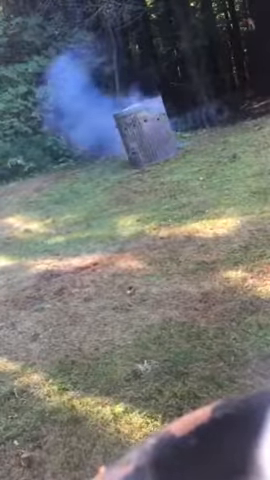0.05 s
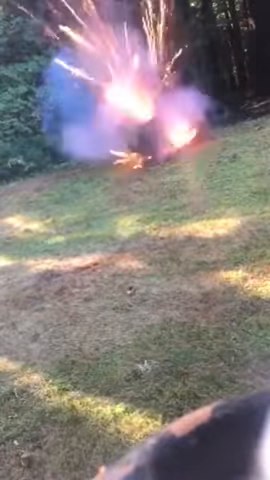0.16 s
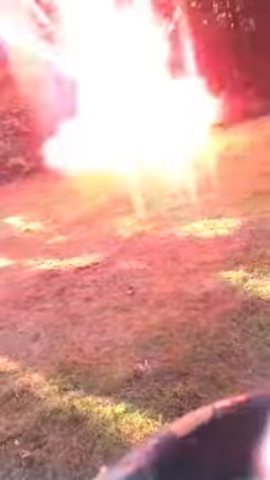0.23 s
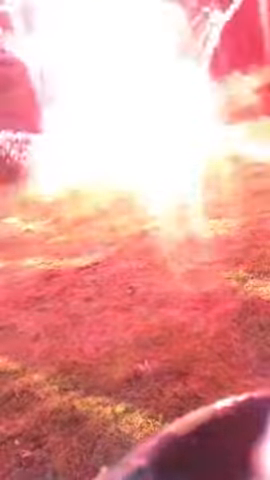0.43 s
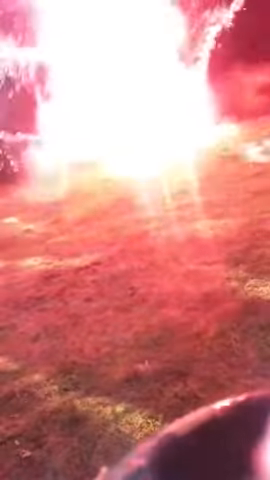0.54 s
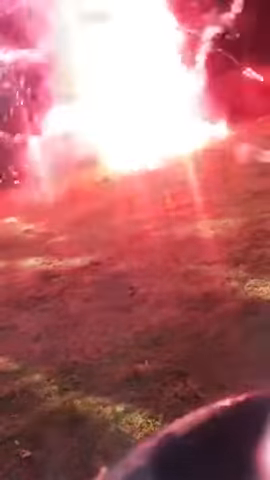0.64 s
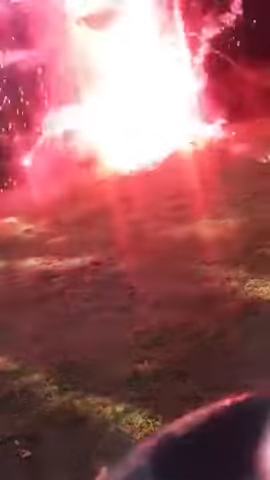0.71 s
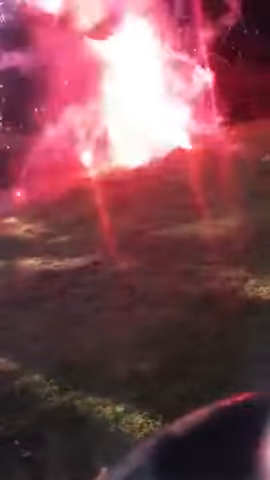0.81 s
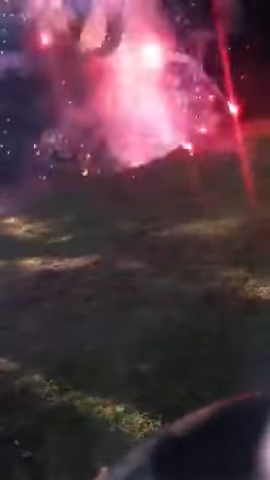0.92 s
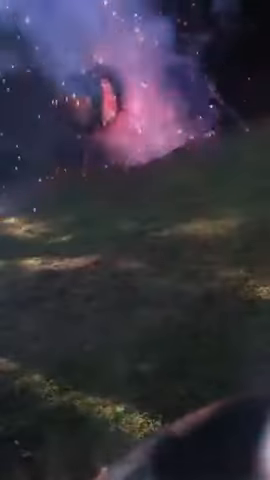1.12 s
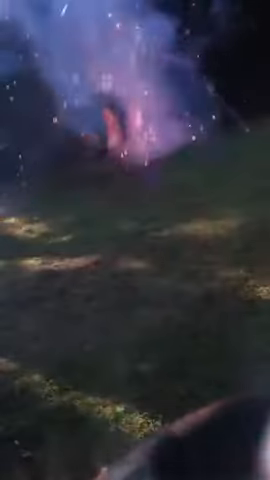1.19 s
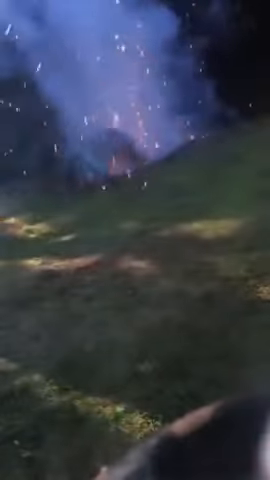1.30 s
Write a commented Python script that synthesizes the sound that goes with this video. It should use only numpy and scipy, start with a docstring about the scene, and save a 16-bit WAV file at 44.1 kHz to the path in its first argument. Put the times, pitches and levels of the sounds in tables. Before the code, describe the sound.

A firework explodes inside a trash can with a loud bang and rumbling echo.

```python
"""A firework shell bursts inside a trash can on a lawn at the edge of a wood.
First the fuse hisses over a swelling hum. The casing cracks, the can howls for an instant,
then the blast tears out in a rush of gas and the can's air booms. Bass rolls round the clearing
and the trees throw back a long echo while the hollow roar of burning stars builds.
One star snaps close by, others sputter, and at last debris comes down."""
import sys
import numpy as np
from scipy.fft import rfft, irfft, next_fast_len
from scipy.io import wavfile
from scipy.ndimage import map_coordinates

SR = 44100
rng = np.random.default_rng(int(sys.argv[2]) if len(sys.argv) > 2 else 0)


def store_wav(level_fs):
    """Save 16-bit WAV to argv[1]."""
    pcm = np.round(np.clip(np.atleast_2d(level_fs), -1, 1) * 32767)
    wavfile.write(sys.argv[1], SR, pcm.T.astype(np.int16))


N = 59535
T = np.arange(N) / SR
BURST_S, GAS_S = 0.174, 0.228  # cues: the shell gives way, the gas tears out

# pressure fronts, casing cracks first, then the blast: start_s, level_db, t60_s
FRONT_HITS = [(.1962, -25.5, 0.058), (.2021, -23, 0.0045), (0.2172, -2.5, 0.0097), (0.2194, -8.5, 0.0072),
              (.2231, -11.5, 0.0075), (0.2326, -12.5, 0.0067)]
# tone of the fronts: freq_hz, relative_db
FRONT_EQ = [(100, 3.5), (700, 6), (1800, 2.5), (4200, -6.5), (10000, -12), (16000, -18)]
# the can's brief howl: peak_s, pitch_hz, level_db, rise_s, t60_s
HOWL_MODES = [(0.2096, 1123, -4.5, 0.0028, 0.023), (.214, 597, -3.5, 0.0033, 0.034),
              (0.215, 2756, -20, 0.0081, 0.01), (0.215, 3110, -18, 0.0057, 0.019)]
# dull punch of the can giving way: freq_hz, relative_db
PUNCH_EQ = [(100, -27), (230, 0), (400, -13.5), (580, -7.5), (800, -5.5), (1150, -4), (1500, -18.5),
            (3000, -22), (4200, -54)]
# air booming in and around the can: pitch_hz, level_db, t60_s
BOOM_MODES = [(66.3, -21, 0.73), (135, -12, 0.14), (164.1, -16, 0.41)]
# rushing gas of the fireball: freq_hz, relative_db
GAS_EQ = [(150, -64), (250, -12), (450, -10), (640, 1), (800, -5.5), (970, 0), (1150, -8.5), (2100, -4.5),
          (3000, -14), (6500, -13.5), (10500, -21), (16000, -23.5)]
# rolling bass: freq_hz, relative_db
RUMBLE_EQ = [(25, -37), (45, -2.5), (97, 2.5), (170, -6.5), (230, -19.5), (320, -44)]
# low thuds and swells: peak_s, level_db, pitch_hz, rise_s
THUD_HITS = [(0.2407, -7, 47, 0.0049), (.305, -15.5, 109.4, 0.0097), (0.365, -13.5, 92, 0.0093),
             (.404, -22.5, 87, 0.0038), (.441, -24.5, 81.5, 0.019), (.535, -28, 78, .02),
             (.595, -31, 122.7, 0.027), (0.724, -36.5, 100, 0.01), (.77, -32, 70, 0.0059),
             (1.265, -32, 70, 0.0099), (1.345, -33, 80, 0.0085)]
# the wood's answer: freq_hz, relative_db
ECHO_EQ = [(150, -42), (280, -23), (386, -3), (629, -4.5), (1350, -4.5), (1980, -6.5), (3460, -20),
           (9330, -30.5), (16000, -34)]
# ring of the snapping star: pitch_hz, level_db, t60_s
SNAP_RING = [(2250, -32, 0.0073), (3300, -34, .015), (6700, -25, .009), (9660, -28, 0.0053),
             (11200, -37, 0.01)]
# the snap's duller tail: freq_hz, relative_db
SNAP_TAIL_EQ = [(400, -18), (1300, 5), (2900, -2), (4200, -22)]
# hollow resonances of the burning stars: pitch_hz, width_hz, relative_db
HOLLOW_MODES = [(602, 53, -1.5), (684, 52, 0), (939, 48, -2.5), (1350, 44, -7.5), (1870, 120, -16.5)]
# broad rush of the burning stars: freq_hz, relative_db
BURN_EQ = [(25, -37), (45, -11.5), (64, -2), (108, -8.5), (185, -13), (285, -30.5), (400, -22.5),
           (500, -18.5), (640, -8), (760, -23), (936, -22), (1700, -23.5), (2200, -22), (3160, -39),
           (5430, -36), (8000, -41.5), (12000, -38.5), (16000, -43)]
# sputters of the stars: start_s, level_db, t60_s
SPUTTER_HITS = [(1.093, -47, 0.075), (1.171, -52.5, 0.33), (1.256, -51, 0.022), (1.32, -43.5, .05)]
# their bright fizz: freq_hz, relative_db
SPUTTER_EQ = [(1500, -35), (3300, -3), (4400, 4), (6200, 1), (8000, -11), (16000, -17)]
# rustle of landing debris: freq_hz, relative_db
DEBRIS_EQ = [(100, -8), (600, -6), (1010, -8), (1760, -8), (3000, -23), (16000, -39)]
# fuse hiss and outdoor air: freq_hz, relative_db
FUSE_EQ = [(25, -2), (70, 13), (250, -1), (950, 0), (2020, -8.5), (2750, -17.5), (3200, -7.5),
           (3700, -20.5), (4450, -9.5), (4950, -30), (5700, -10.5), (8000, -31), (16000, -24)]


def pressure_fronts():
    """Each front is a short, sharp crack; the main one carries a shock: a push, then suction."""
    shock_s, push_s = 0.2174, 0.00012
    level = sum(amp(db) * envelope(start, 0.00027, 0, 60 / t60) for start, db, t60 in FRONT_HITS)
    age = np.maximum(T - shock_s, 0) / push_s
    shock = amp(5) * (T > shock_s) * (1 - age) * np.exp(-age)
    return level * noise(FRONT_EQ) + shock


def trash_can():
    """The can howls as pressure builds, gives way with a dull punch, then its air booms."""
    howl = sum(amp(db) * ring(peak, hz, rise, t60, rough=0.4) for peak, hz, db, rise, t60 in HOWL_MODES)
    punch = amp(-11.5) * envelope(0.2075, 0.013, 0, fall_db_per_s=362) * noise(PUNCH_EQ)
    boom = sum(amp(db) * ring(0.2275, hz, 0.012, t60) for hz, db, t60 in BOOM_MODES)
    return howl * (T > BURST_S) + punch + boom


def fireball():
    """Gas tears out in a dense, uneven crackle and dies quickly, with a short falling whoop."""
    level = amp(-11.6 + wobble(130.1)) * envelope(GAS_S, 0.013, 0.01, fall_db_per_s=228)
    whoop = amp(-16.5) * ring(0.283, hz=670.3, rise_s=0.0063, t60_s=0.072, rough=0.4, sag_hz_per_s=8800)
    return level * crackle(GAS_EQ, rate=3500, share=0.32) + whoop


def rumble():
    """Bass rolls round the clearing in distinct swells; a slow swell also dies slowly."""
    roll = amp(-20.5) * envelope(0.21, 0.012, 0, fall_db_per_s=46.5) * noise(RUMBLE_EQ)
    thuds = sum(amp(db) * ring(peak, hz, rise, t60_s=7.5 * rise) for peak, db, hz, rise in THUD_HITS)
    return roll + thuds


def tree_echo():
    """Bushes answer at once; then come a slap off the trunks, a ringing note and a scattered tail."""
    slap_s = 0.4228
    bushes = amp(-30) * envelope(GAS_S, 0.013, 0, fall_db_per_s=63)
    wood = amp(-35) * envelope(slap_s, 0.03, 0.082, fall_db_per_s=48.5)
    slap = amp(-31) * envelope(slap_s, 0.00052, 0, fall_db_per_s=2000)
    note = amp(-29) * ring(0.457, hz=662, rise_s=0.0041, t60_s=0.085)
    return (np.hypot(bushes, wood) + slap) * crackle(ECHO_EQ, rate=1600, share=0.12) + note


def star_snap():
    """One star snaps close by: a bright crack that rings for a moment, with a faint, duller tail."""
    start_s, rise_s, crack_t60_s = 0.8986, 0.00015, 0.013
    hiss = unit(filtered(rng.standard_normal(N), lambda hz: hz > 1800))
    crack = amp(-27.5) * envelope(start_s, rise_s, 0, 60 / crack_t60_s) * hiss
    ping = np.zeros(N)
    for hz, db, t60 in SNAP_RING:
        level = amp(db) * envelope(start_s, rise_s, rise_s, 60 / t60)
        ping += level * np.sin(2 * np.pi * hz * (T - start_s))
    tail = amp(-47) * envelope(start_s, 0.0097, 0, fall_db_per_s=420) * noise(SNAP_TAIL_EQ)
    return crack + ping + tail


def burning_stars():
    """The stars burn with a hollow roar over a crackling rush; some sputter."""
    def resonances(f):
        body = sum((-1) ** k * amp(db) * 1j * f * width / (hz * hz - f * f + 1j * f * width)
                   for k, (hz, width, db) in enumerate(HOLLOW_MODES))
        return body / (1 + (f / 2600) ** 6)  # treble roll-off

    hollow = amp(-46.5) * unit(filtered(rng.standard_normal(N), resonances))
    rush = amp(-42) * crackle(BURN_EQ, rate=730, share=0.33)
    swell = envelope(GAS_S, 0.43, 0, fall_db_per_s=0.72)
    sputters = sum(amp(db) * envelope(start, 0.0026, 0, 60 / t60) for start, db, t60 in SPUTTER_HITS)
    return (hollow + rush) * swell + sputters * noise(SPUTTER_EQ)


def debris():
    """Debris lands with a rustling rush."""
    flutter = amp(-36.5 + 1.7 * wobble(200))
    return flutter * envelope(1.321, 0.0018, 0.026, fall_db_per_s=60) * noise(DEBRIS_EQ)


def fuse():
    """A steady bed of fuse hiss and outdoor air; a low hum swells until the shell bursts."""
    hum_hz, swell_db_per_s = 69.8, 84
    swell = amp(-57.5 + swell_db_per_s * np.minimum(T, BURST_S))
    hum = swell * np.sin(2 * np.pi * hum_hz * T)
    return amp(-53.5) * noise(FUSE_EQ) + hum * envelope(0, 0.0022, BURST_S, fall_db_per_s=470)


def amp(db):
    """Decibels to gain."""
    return 10 ** (np.asarray(db) / 20)


def unit(x):
    """Scale to rms 1."""
    return x / np.sqrt(np.mean(x ** 2) + 1e-20)


def filtered(x, response):
    """Run x through a frequency response."""
    size = next_fast_len(N + SR // 2)
    return irfft(rfft(x, size) * response(np.fft.rfftfreq(size, 1 / SR)), size)[:N]


def equalised(x, eq):
    """Shape x with an EQ curve on a log frequency axis, at rms 1."""
    freq_hz, db = np.transpose(eq)
    return unit(filtered(x, lambda hz: amp(np.interp(np.log(hz + 1), np.log(freq_hz + 1), db))))


def noise(eq):
    """Smooth noise through an EQ curve."""
    return equalised(rng.standard_normal(N), eq)


def crackle(eq, rate, share):
    """Noise with a share of its power in tiny random clicks, rate a second."""
    clicks = unit((rng.random(N) < rate / SR) * rng.standard_normal(N))
    return equalised(np.sqrt(share) * clicks + np.sqrt(1 - share) * rng.standard_normal(N), eq)


def wobble(rate):
    """A smooth random curve, rate knots a second."""
    return map_coordinates(rng.standard_normal(400), [T * rate], mode="wrap")


def envelope(start_s, rise_s, hold_s, fall_db_per_s):
    """Power rises linearly, holds, then dies away."""
    t = T - start_s
    attack = np.sqrt(np.clip(t / rise_s, 0, 1))
    return attack * amp(-fall_db_per_s * np.maximum(t - rise_s - hold_s, 0))


def ring(peak_s, hz, rise_s, t60_s, rough=0, sag_hz_per_s=0):
    """A resonance swells to its peak and rings out; rough shakes its phase, sag bends it down."""
    t = T - peak_s
    attack = np.exp(-(np.minimum(t, 0) / rise_s) ** 2 / 2)
    decay = amp(-60 * np.maximum(t, 0) / t60_s)
    phase = 2 * np.pi * (hz - sag_hz_per_s * t / 2) * t
    return attack * decay * np.sin(phase + rough * wobble(400))


def scene():
    """The mono mix, as heard from across the lawn."""
    burst = fuse() + pressure_fronts() + trash_can() + fireball()
    aftermath = rumble() + tree_echo() + burning_stars() + star_snap() + debris()
    return (burst + aftermath)[None]


def record(dry):
    """The microphone rounds off the highest peaks and keeps nothing above its band limit."""
    ceiling, top_hz = 0.93, 15900
    rounded = dry[0] / (1 + np.abs(dry[0] / ceiling) ** 6) ** (1 / 6)
    return filtered(rounded, lambda hz: 1 / (1 + (hz / top_hz) ** 200))[None]


dry = scene()
out = record(dry)
store_wav(out)
```